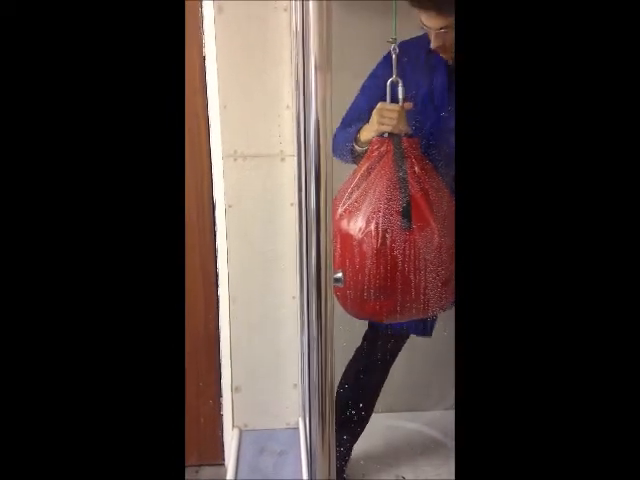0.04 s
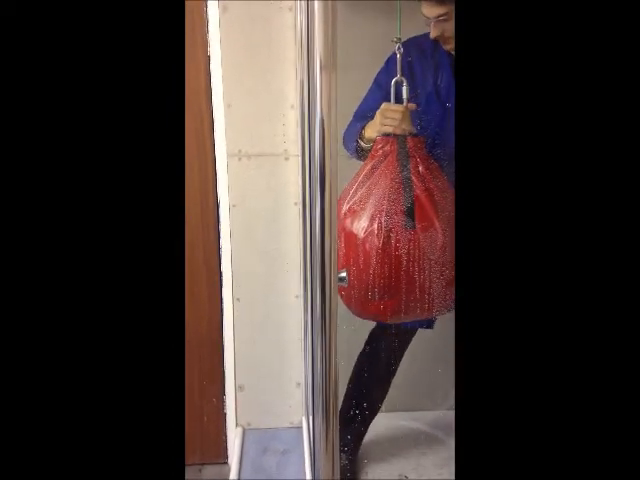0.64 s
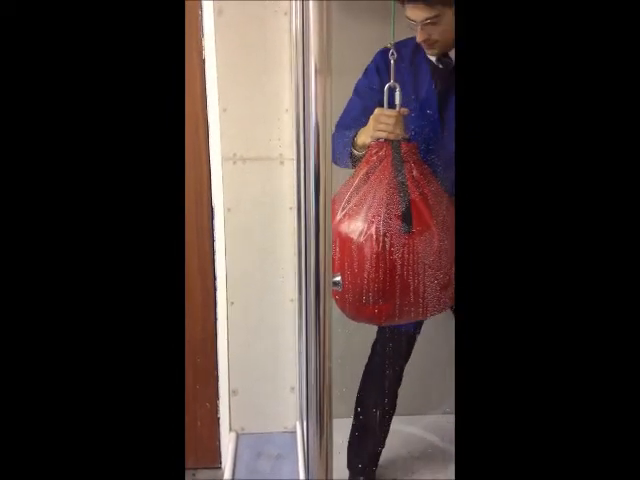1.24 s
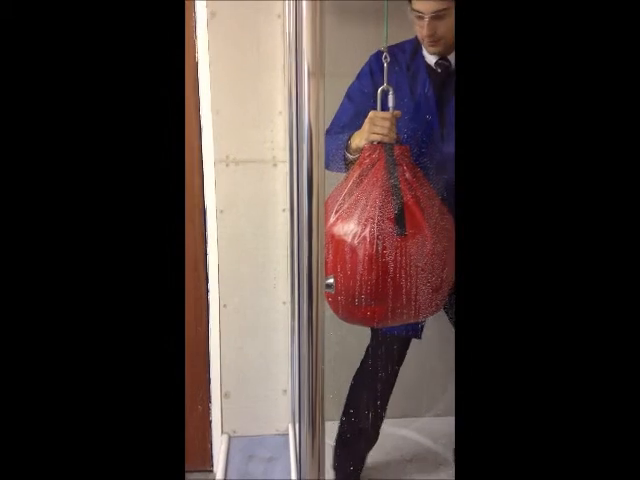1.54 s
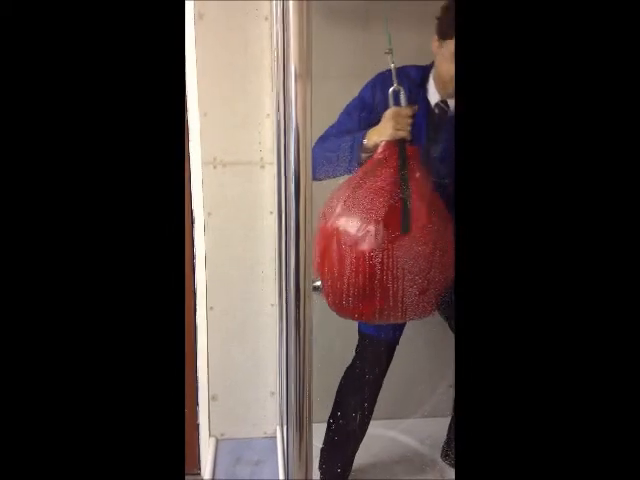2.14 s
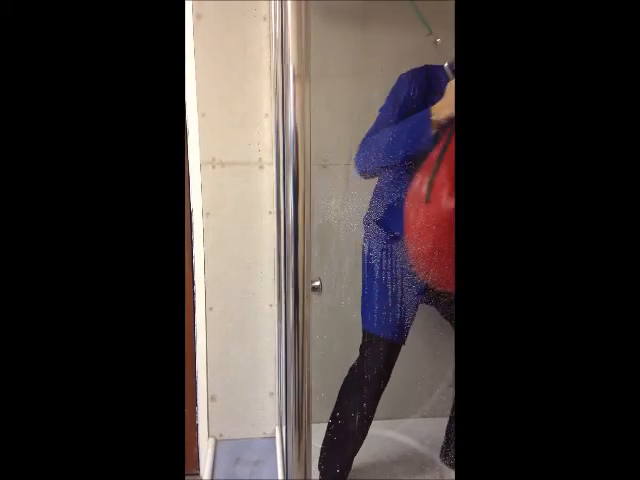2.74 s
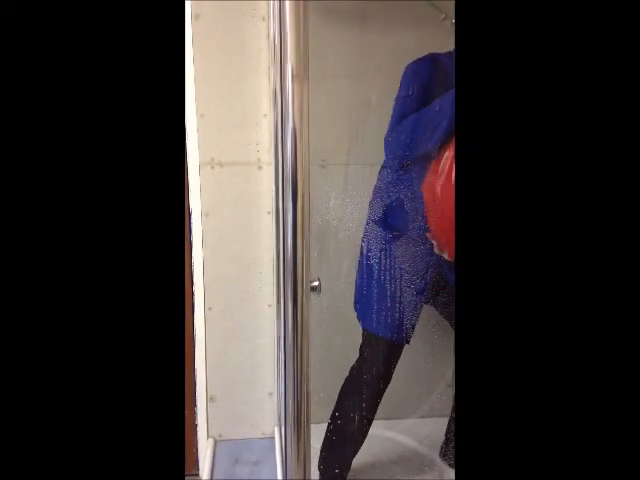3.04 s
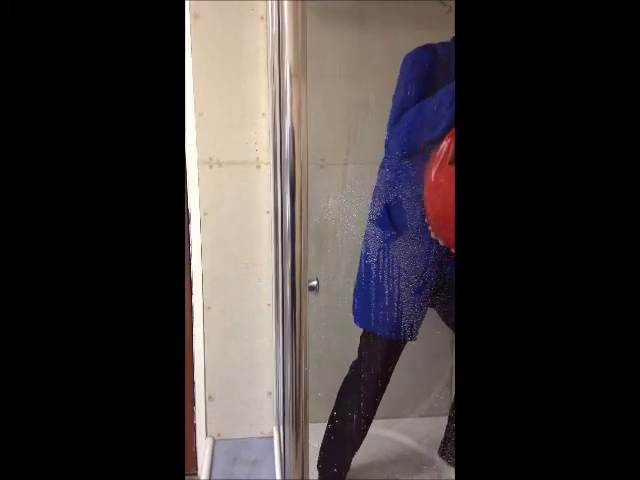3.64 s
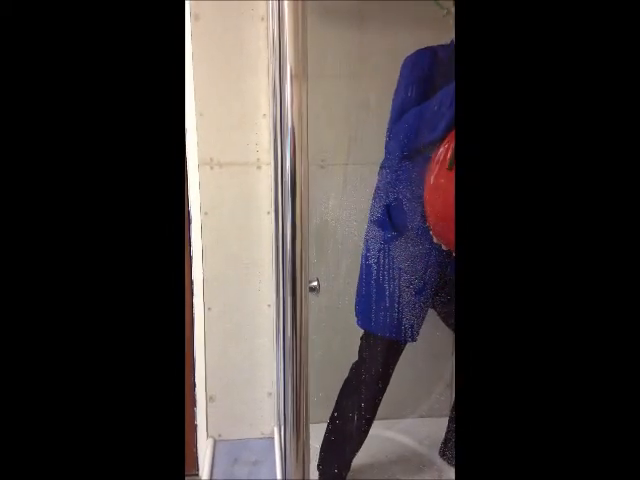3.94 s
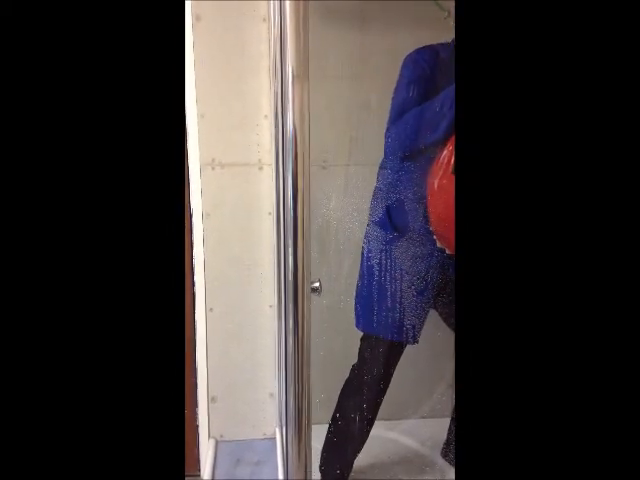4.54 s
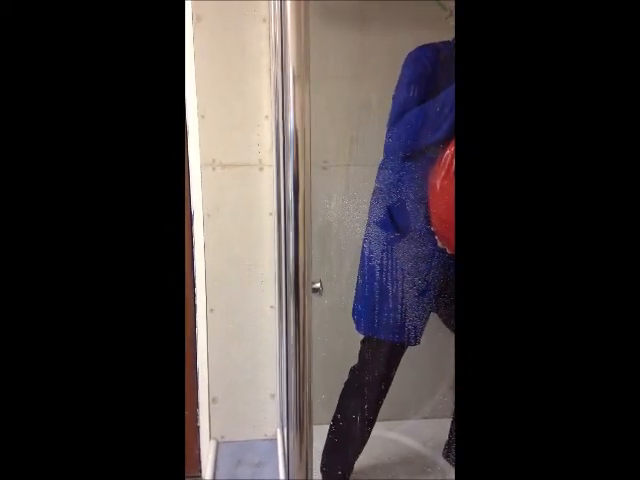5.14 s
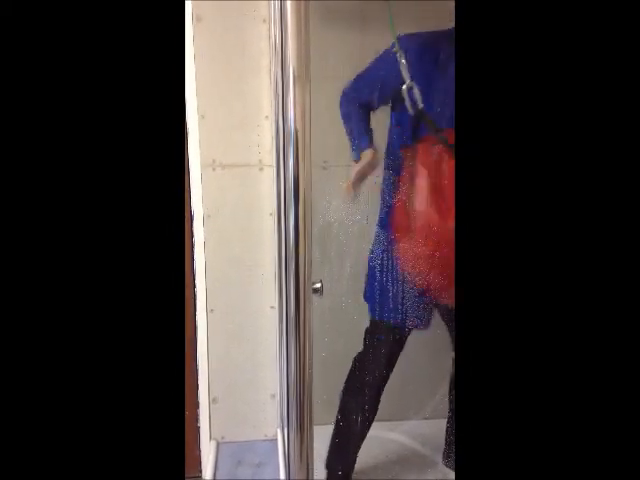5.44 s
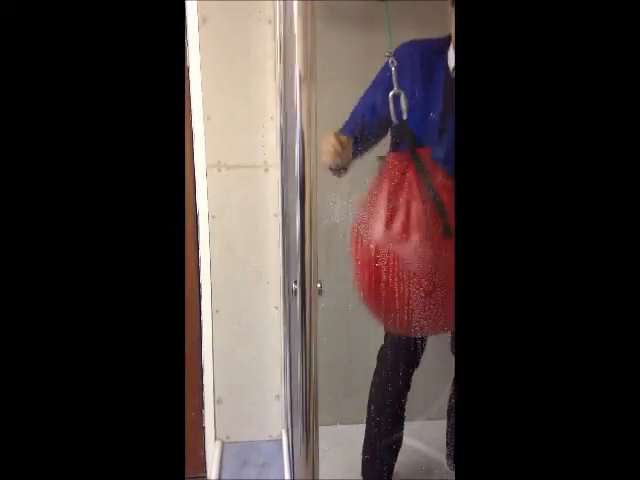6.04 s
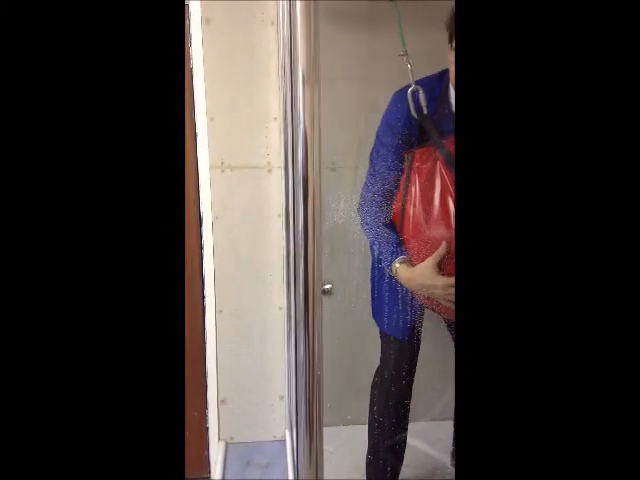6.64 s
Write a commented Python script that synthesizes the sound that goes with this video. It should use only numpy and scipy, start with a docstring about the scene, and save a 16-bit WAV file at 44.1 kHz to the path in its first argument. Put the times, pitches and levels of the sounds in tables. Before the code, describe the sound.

After quiet knocks and rustles, a heavy plastic bag crashes into a glass shower door, which slams three more times and rattles.

```python
"""A glass shower door is burst open by a heavy plastic bag, slams back and rattles in its metal frame.
Each impact is a hail of tiny contacts; the hardest also excite the damped modes of pane, frame and stall.
Before that the bag is drawn back on its metal hook and let go: feet knock on the tray, cloth rubs,
plastic snaps and squeaks, the hook clinks. A small hard room reverberates after every blow."""
import sys
import numpy as np
from scipy import signal
from scipy.fft import rfft, irfft, next_fast_len
from scipy.io import wavfile
from scipy.ndimage import uniform_filter1d

SR = 44100
rng = np.random.default_rng(int(sys.argv[2]) if len(sys.argv) > 2 else 0)


def master_out(mix):
    """Clip the mix to full scale and print it as 16-bit PCM to the path in sys.argv[1]."""
    frames = np.transpose(np.atleast_2d(mix))
    ceiling = np.clip(frames, -1, 1)
    pcm = np.round(ceiling * 32767).astype(np.int16)
    wavfile.write(sys.argv[1], SR, pcm)


N = 300321
TIME = np.arange(N) / SR
AGE = np.arange(SR) / SR  # the second that follows a blow
# the bag touches the glass, lands with its full weight and presses on until the catch opens
TOUCH_S, LAND_S, OPEN_S = 5.847, 5.861, 5.9245


def gain_of(db):
    """Amplitude ratio: tenfold for every 20 dB."""
    return 10 ** (np.asarray(db) / 20)


def unit_rms(x):
    """Normalisation to unit power."""
    return x / np.sqrt(np.mean(x ** 2) + 1e-20)


def curve_at(points, hz):
    """Interpolation on a logarithmic frequency axis."""
    f, value = np.transpose(points)
    return np.interp(np.log(hz + 1), np.log(f + 1), value)


def decay(t, t60):
    """Exponential damping: 60 dB down after t60 seconds."""
    return np.exp(-np.log(1000) * t / np.maximum(t60, 1e-3))


def add(mix, s, sound):
    """Superposition of a sound that starts at s seconds."""
    part = mix[max(round(s * SR), 0):][:len(sound)]
    part += sound[:len(part)]


def coloured(x, spectrum, bass_db=0, mid_db=0, treble_db=0):
    """Minimum-phase filtering: the spectrum is scaled to unit power, then tilted in three bands."""
    hz = abs(np.fft.fftfreq(len(x), 1 / SR))
    tilt = [(260, bass_db), (650, mid_db), (1600, mid_db), (3200, 0.016), (10000, treble_db)]
    gain = unit_rms(gain_of(curve_at(spectrum, hz))) * gain_of(curve_at(tilt, hz))
    causal = np.exp(np.conj(signal.hilbert(np.log(gain + 1e-5))))
    return np.fft.ifft(np.fft.fft(x) * causal).real


def contacts(size, per_s):
    """Shot noise: a random hail of tiny impacts, rms 1."""
    return unit_rms(rng.standard_normal(size) * (rng.random(size) < per_s / SR))


def stroke(rise, t60, hold=0):
    """Contact force: a linear rise, a hold and an exponential release."""
    return np.minimum(AGE / max(rise, 1 / SR), 1) * decay(np.maximum(AGE - rise - hold, 0), t60)


def ring(modes, rise, blur_hz=0, hold=0):
    """Modal vibration: damped sines swell in over the contact time; loose joints blur their pitch."""
    tones = np.zeros(SR)
    phase_step = np.sqrt(blur_hz / (2 * np.pi * SR))
    for hz, db, t60 in modes:
        wander = np.cumsum(rng.standard_normal(SR)) * phase_step if blur_hz else 0
        envelope = gain_of(db) * decay(np.maximum(AGE - hold, 0), t60)
        tones += envelope * np.sin(2 * np.pi * (hz * AGE + wander + rng.random()))
    return tones * (1 - np.exp(-AGE / rise))


# reverberation time of the room: (frequency [Hz], t60 [s])
ROOM_DECAY = [(100, 0.74), (250, 0.97), (600, 0.88), (1500, 0.68), (3000, 0.75), (7000, 0.68),
              (14000, 0.29)]

def room_paths(count=5):
    """Transfer functions from a few places in the room; absorption takes the highest treble first."""
    reflections = np.array([contacts(SR, 7000) for _ in range(count)]) * (1 - np.exp(-AGE / 0.0013))
    hz, t, spectra = signal.stft(reflections, SR, nperseg=256)
    damped = spectra * decay(t, curve_at(ROOM_DECAY, hz)[:, None])
    tails = signal.istft(damped, SR, nperseg=256)[1][:, :SR]
    return rfft(tails / np.linalg.norm(tails, axis=1, keepdims=True), 2 * SR)


def in_room(x, paths, room_db):
    """Direct plus reverberant sound: each tiny contact is convolved with the path from its own place."""
    place = rng.integers(0, len(paths), len(x))
    echoes = irfft(sum(rfft(x * (place == k), 2 * SR) * path for k, path in enumerate(paths)))
    return x + gain_of(room_db) * echoes[:len(x)]


# spectra of room air and of sliding friction: (frequency [Hz], relative density [dB])
AIR_SPECTRUM = [(15, -73), (25, -46), (64, -17), (113, -15), (144, 0), (246, -7.5), (340, -6.5), (368, -14),
                (445, -8), (582, -12.5), (1080, -18), (1710, -23), (3930, -27.5), (10100, -35),
                (15500, -31)]
FRICTION_SPECTRUM = [(35, -67), (60, -33), (145, -9.5), (400, -10), (560, -6), (750, -12.5), (890, -6.5),
                     (1400, -10.5), (2100, -10), (4200, -13), (7000, -18), (15500, -30)]
# envelope of rustling clothes: (time [s], level [dB])
RUSTLE_LEVELS = [(0, -59), (.6, -72), (1.5, -62.5), (2.0, -66), (3.0, -66.5), (3.4, -61), (4.4, -71.5),
                 (4.8, -86), (5.3, -70)]

def background(air_db=-58):
    """Stationary noise of room air under the slowly modulated friction noise of clothes."""
    size = next_fast_len(N)
    air = gain_of(air_db) * coloured(rng.standard_normal(size), AIR_SPECTRUM)[:N]
    cloth = coloured(contacts(size, 5000), FRICTION_SPECTRUM, bass_db=3.5, treble_db=1)[:N]
    return air + cloth * gain_of(np.interp(TIME, *np.transpose(RUSTLE_LEVELS)))


# the coat brushes the bag: (time [s], level [dB], rise [s], t60 [s])
COAT_STROKES = [(1.60, -57.5, .024, 0.37), (2.72, -53, 0.018, 0.39), (3.062, -42, .012, 0.15),
                (3.085, -39, 0.021, 0.093), (3.46, -59, 0.1, 0.61), (3.58, -51, 0.054, 0.19)]

def scuffs(paths):
    """Sliding friction: cloth sheds fine grains of noise in short strokes."""
    out = np.zeros(N)
    for s, db, rise, t60 in COAT_STROKES:
        grains = in_room(contacts(SR, 10000) * stroke(rise, t60), paths, room_db=1)
        swish = coloured(grains, FRICTION_SPECTRUM, bass_db=-3, mid_db=-0.8, treble_db=3)
        add(out, s, gain_of(db) * swish)
    return out


# snaps of the bag: (time [s], level [dB], bass and middle gain [dB])
PLASTIC_SNAPS = [(0.969, -63, 3), (1.158, -48, -20), (2.711, -45, -6.5), (5.509, -37.5, -7.5)]

def snaps(paths):
    """Impulsive excitation: taut plastic snaps in brief, bright bursts."""
    out = np.zeros(N)
    for s, db, body_db in PLASTIC_SNAPS:
        grains = in_room(contacts(SR, 10000) * stroke(0.0037, .075), paths, room_db=1)
        add(out, s, gain_of(db) * coloured(grains, FRICTION_SPECTRUM, body_db, body_db, treble_db=8))
    return out


# course of the squeak: (time [s], pitch [Hz], level [dB])
SQUEAK_GLIDE = [(1.535, 3141, -63), (1.539, 2955, -47.5), (1.548, 2336, -47.5), (1.556, 1810, -50),
                (1.566, 3090, -59), (1.60, 2920, -54), (1.612, 3050, -72)]
# skin rubbing plastic: (frequency [Hz], relative density [dB])
RUB_SPECTRUM = [(200, -12), (600, 0.5), (1400, -1), (3100, -1), (3700, -7.5), (8000, -16), (15000, -31.5)]

def squeak(paths, jitter=0.05, rub_db=-2):
    """Stick-slip of a hand on wet plastic: an unsteady whistle over a rubbing noise."""
    s, hz, db = np.transpose(SQUEAK_GLIDE)
    t = s[0] + AGE
    waver = unit_rms(uniform_filter1d(rng.standard_normal(SR), size=24))
    pitch = np.interp(t, s, hz) * (1 + jitter * waver)
    whistle = np.sin(2 * np.pi * np.cumsum(pitch) / SR)
    rub = gain_of(rub_db) * coloured(contacts(SR, 6500), RUB_SPECTRUM)
    envelope = gain_of(np.interp(t, s, db)) * (t < s[-1])
    out = np.zeros(N)
    add(out, s[0], in_room((whistle + rub) * envelope, paths[:1], room_db=-1))
    return out


# the hook shifts: (time [s], hook level [dB], shackle level [dB], scrape level [dB])
HOOK_CLINKS = [(0.268, -54, -78, -58), (0.303, -57, -53.5, -54), (2.673, -70, -80, -58)]
# modes of hook and shackle: (frequency [Hz], relative level [dB], t60 [s])
HOOK_MODES = [(3350, 3, 0.17), (8020, 8, 0.28), (8400, -5, 0.22), (11400, -4, 0.3), (15300, -12, .2)]
SHACKLE_MODES = [(4150, 2, 0.28), (5582, -1, .32), (6840, -5.5, .3), (8300, -1, .2), (11990, -9, .3),
                 (14060, -13, .3)]
# metal grating on metal: (frequency [Hz], relative density [dB])
GRATE_SPECTRUM = [(300, -15), (2000, -1.5), (4000, -3.5), (8200, -1.5), (9800, -13), (11500, -5),
                  (15000, -12)]

def hook(paths):
    """Free vibration of metal: the hook grates in its shackle and both ring in inharmonic modes."""
    out = np.zeros(N)
    for s, hook_db, shackle_db, scrape_db in HOOK_CLINKS:
        grains = in_room(contacts(SR, 3500) * stroke(0.006, 0.21), paths, room_db=0)
        add(out, s, gain_of(scrape_db) * coloured(grains, GRATE_SPECTRUM))
        add(out, s, gain_of(hook_db) * ring(HOOK_MODES, .005, blur_hz=25))
        add(out, s, gain_of(shackle_db) * ring(SHACKLE_MODES, 0.0036, blur_hz=24))
    return out


# feet on the shower tray: (time [s], level [dB], rise [s], sole level [dB])
FOOT_KNOCKS = [(0.0, -47, 0.0087, -53), (0.045, -44, 0.0085, -54.5), (0.22, -54, .012, -63),
               (0.48, -54.5, .01, -74), (1.17, -47, .013, -68), (1.190, -34, 0.0018, -54.5),
               (1.233, -43.5, .003, -64), (1.742, -47, .006, -60), (1.785, -53, 0.023, -70),
               (5.37, -58, .015, -70), (5.58, -43.5, 0.016, -48), (5.78, -42, .01, -49.5)]
# a dull impact: (frequency [Hz], relative density [dB])
THUD_SPECTRUM = [(30, -53), (65, -15), (120, -11.5), (166, 0.5), (206, -5.5), (291, -2), (380, -11.5),
                 (520, -13), (650, -21), (900, -28), (1700, -30), (4000, -49), (8800, -87)]
# modes of the tray: (frequency [Hz], relative level [dB], t60 [s])
TRAY_MODES = [(180.9, 4.5, 0.472), (238.5, 0.5, 0.8), (255.7, -1.5, 0.35), (289, -2.5, 0.73),
              (333, -8, 0.71)]

def footfalls(paths, ring_db=-5):
    """Impact on a resonator: a heel thuds, the hollow tray booms and the sole scuffs."""
    out = np.zeros(N)
    for s, db, rise, sole_db in FOOT_KNOCKS:
        push = in_room(contacts(SR, 6000) * stroke(rise, t60=0.11), paths, room_db=0)
        thud = coloured(push, THUD_SPECTRUM, bass_db=-1)
        boom = gain_of(ring_db) * ring(TRAY_MODES, 0.0026)
        sole = coloured(push, FRICTION_SPECTRUM, bass_db=4, mid_db=6.5, treble_db=-9)
        add(out, s, gain_of(db) * (thud + boom) + gain_of(sole_db) * sole)
    return out


# relative envelopes of the swinging bag: (time [s], swish [dB], rumble [dB], hiss [dB])
SWING_LEVELS = [(5.33, -67, -60, -78), (5.376, -64, -56, -69), (5.426, -53, -62, -54),
                (5.502, -49.5, -49, -55), (5.508, -45.5, -46, -46.5), (5.594, -43, -39.5, -51),
                (5.69, -47, -44.5, -58), (5.748, -44, -45.5, -51.5), (5.835, -49.5, -44, -62)]

def swing(rumble_db=-3, hiss_db=-2):
    """Friction noise: the bag slides off the coat, swishing, rumbling and hissing until it lands."""
    s, swish, rumble, hiss = np.transpose(SWING_LEVELS)
    size = next_fast_len(N)
    moving = (TIME > s[0]) & (TIME < LAND_S)
    cloth = coloured(contacts(size, 14000), FRICTION_SPECTRUM, bass_db=4, mid_db=1.5, treble_db=-6.5)
    body = coloured(contacts(size, 6000), THUD_SPECTRUM, bass_db=1, mid_db=5, treble_db=-3)
    plastic = coloured(contacts(size, 14000), FRICTION_SPECTRUM, bass_db=-14, mid_db=-15, treble_db=10.5)
    layers = [(cloth, swish), (body, rumble + rumble_db), (plastic, hiss + hiss_db)]
    return moving * sum(noise[:N] * gain_of(np.interp(TIME, s, db)) for noise, db in layers)


# glass striking its frame: (frequency [Hz], relative density [dB])
CHATTER_SPECTRUM = [(30, -50), (70, -21), (115, -21), (155, -6), (260, -4.5), (370, -7.5), (600, -9.5),
                    (1150, -12.5), (2200, -9), (4500, -14), (5400, -18), (8700, -19.5), (9500, -25.5),
                    (12400, -22), (15500, -30)]

def chatter(paths, force, room_db, bass_db, mid_db, treble_db):
    """Contact noise: glass and frame collide in tiny impacts for as long as a force acts."""
    hail = in_room(contacts(SR, 11000) * force, paths, room_db)
    return coloured(hail, CHATTER_SPECTRUM, bass_db, mid_db, treble_db)


# light knocks around the slams: (time [s], level [dB], treble gain [dB])
FRAME_RATTLES = [(6.012, -30.5, -4), (6.070, -30.5, 3.5), (6.114, -32, 1), (6.354, -36.5, 6),
                 (6.438, -27, 4), (6.466, -26.5, 9.5), (6.565, -28.5, 7), (6.635, -33, 8),
                 (6.684, -29.5, 11), (6.757, -27, 0)]

def rattles(paths):
    """Mechanical play: the glass knocks brightly in its loose frame."""
    out = np.zeros(N)
    for s, db, treble_db in FRAME_RATTLES:
        knock = chatter(paths, stroke(0.0034, .13), room_db=5, bass_db=4, mid_db=1, treble_db=treble_db)
        add(out, s, gain_of(db) * knock)
    return out


# the door hits its frame:
# (time [s], crack [dB], rebound [dB], shudder [dB], pane [dB], frame [dB], boom delay [s])
DOOR_SLAMS = [(6.1915, -8, -17.5, -24, -26, -39, .036), (6.449, -19, -25, -27.5, -42.5, -41, 0.0039),
              (6.695, -18, -20.5, -29, -34, -40, .055)]
# modes of glass pane, metal frame and whole stall: (frequency [Hz], relative level [dB], t60 [s])
PANE_MODES = [(345, -4.5, 1), (447, -5, 0.6), (490, -2, 0.99), (598, 5.5, 0.54), (708, -0.5, 0.67),
              (830, -18, 0.42), (980, -1.5, .4), (1085, 5, 0.41), (1170, -19, .46), (1291, -1, 0.55),
              (1410, -8, 0.66), (1516, 8, 0.29), (1536, 3.5, 0.35), (1709, 4, 0.66), (1755, 10.5, 0.277),
              (2095, 7, 0.34), (2370, 8, 0.21)]
FRAME_MODES = [(1850, -3.5, 0.89), (1964, 0.5, 0.96), (1990, -1.5, 0.9), (2120, -1, 0.6), (2610, -9, 0.81),
               (2670, -2, 0.66), (2860, 3, 0.45), (2920, -6, 0.66), (3050, -1.5, 0.92), (3250, -10, 0.86),
               (3550, -9, 0.59), (4320, -17, 0.47), (4500, -14, .3)]
STALL_MODES = [(71, -24, 0.82), (165, -4, 0.74), (181.7, -1.5, 0.65), (257, -4, 0.99), (283.6, -5, 0.62)]

def slams(paths, rebound_lag_s=.022, shudder_lag_s=.066, boom_over_shudder_db=0.5):
    """Impact and rebound: pane and frame ring, the door hits again and the stall shudders and booms."""
    out = np.zeros(N)
    for s, crack_db, rebound_db, shudder_db, pane_db, frame_db, boom_lag in DOOR_SLAMS:
        crack = chatter(paths, stroke(.0049, .074), room_db=-.5, bass_db=-6.5, mid_db=3.5, treble_db=-6.5)
        rebound = chatter(paths, stroke(.0055, .11), room_db=2, bass_db=1.5, mid_db=5.5, treble_db=4.5)
        shudder = chatter(paths, stroke(.019, .19), room_db=2.5, bass_db=6.5, mid_db=4, treble_db=-.5)
        add(out, s, gain_of(crack_db) * crack)
        add(out, s, gain_of(pane_db) * ring(PANE_MODES, .0024))
        add(out, s, gain_of(frame_db) * ring(FRAME_MODES, .0016, blur_hz=25))
        add(out, s + rebound_lag_s, gain_of(rebound_db) * rebound)
        add(out, s + shudder_lag_s, gain_of(shudder_db) * shudder)
        boom = ring(STALL_MODES, .0055, hold=.047)
        add(out, s + boom_lag, gain_of(shudder_db + boom_over_shudder_db) * boom)
    return out


# modes of the pane loaded by the bag: (frequency [Hz], relative level [dB], t60 after release [s])
LOADED_PANE_MODES = [(164.2, -3.5, 0.12), (258, -5, 0.084), (449.6, -5, .06), (597.7, -1, 0.044),
                     (873, -4, .04), (1019, -3.5, 0.03)]

def burst(paths, slap_lag_s=.014):
    """Forced, then free vibration: the bag loads the pane until the catch snaps and the frame rings."""
    out = np.zeros(N)
    press_s = OPEN_S - LAND_S
    weight = stroke(.012, .062, hold=press_s - .018)
    touch = chatter(paths, stroke(.006, .14), room_db=2, bass_db=-3, mid_db=3, treble_db=-2.5)
    land = chatter(paths, stroke(.0014, .08), room_db=-6.5, bass_db=-3.5, mid_db=-2, treble_db=-6)
    press = chatter(paths, weight, room_db=-10.5, bass_db=2.5, mid_db=1, treble_db=-2)
    slap = chatter(paths, stroke(.002, .29), room_db=-11.5, bass_db=4, mid_db=5.5, treble_db=14)
    catch = chatter(paths, stroke(.00087, .043), room_db=-4.5, bass_db=-14, mid_db=-19, treble_db=9)
    add(out, TOUCH_S, gain_of(-22) * touch)
    add(out, LAND_S, gain_of(-9) * land + gain_of(-15.5) * press)
    add(out, LAND_S, gain_of(-18) * ring(LOADED_PANE_MODES, .016, blur_hz=4.5, hold=press_s - .008))
    add(out, LAND_S, gain_of(-42) * ring(PANE_MODES, .0012))
    add(out, LAND_S, gain_of(-39) * ring(FRAME_MODES, .0016, blur_hz=25))
    add(out, LAND_S + slap_lag_s, gain_of(-19) * slap)  # the plastic skin flattens on the glass
    add(out, OPEN_S, gain_of(-10) * catch + gain_of(-26) * ring(FRAME_MODES, .0016, blur_hz=30))
    return out


def scene():
    """Superposition of all sources in one room, at one microphone."""
    paths = room_paths()
    door = burst(paths) + slams(paths) + rattles(paths)
    handling = footfalls(paths) + scuffs(paths) + snaps(paths) + hook(paths) + squeak(paths) + swing()
    return (door + handling + background())[None]


def record(dry, low_hz=48, high_hz=15550, ceiling=.9):
    """Band limiting and soft saturation: deep bass is shed, peaks are rounded, top treble is cut."""
    lean = signal.sosfilt(signal.butter(2, low_hz, "highpass", fs=SR, output="sos"), dry)
    rounded = lean / (1 + (lean / ceiling) ** 6) ** (1 / 6)
    lowpass = signal.firwin(511, high_hz, window=("kaiser", 9), fs=SR)
    return signal.oaconvolve(rounded, lowpass[None], "same")


dry = scene()
out = record(dry)
master_out(out)
```